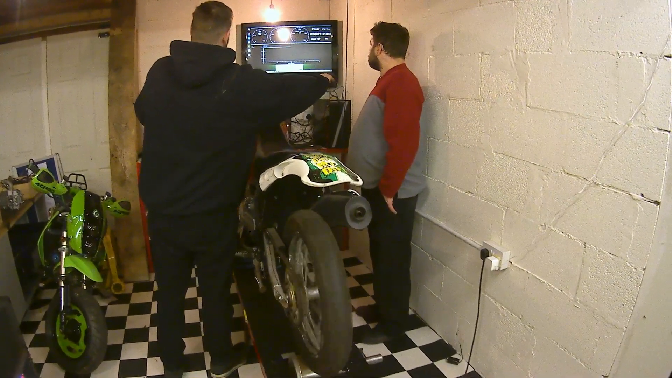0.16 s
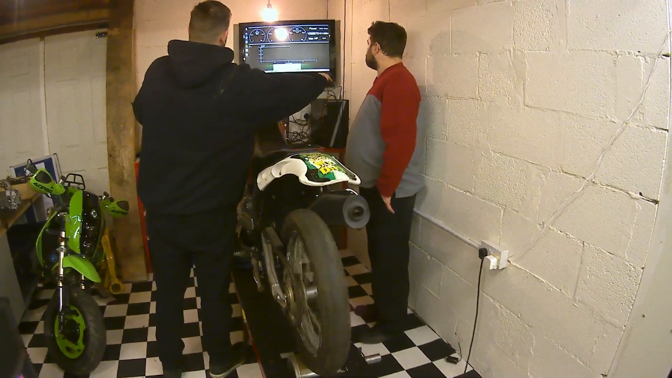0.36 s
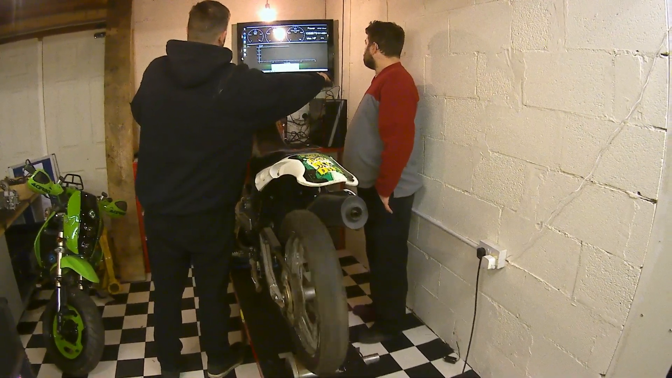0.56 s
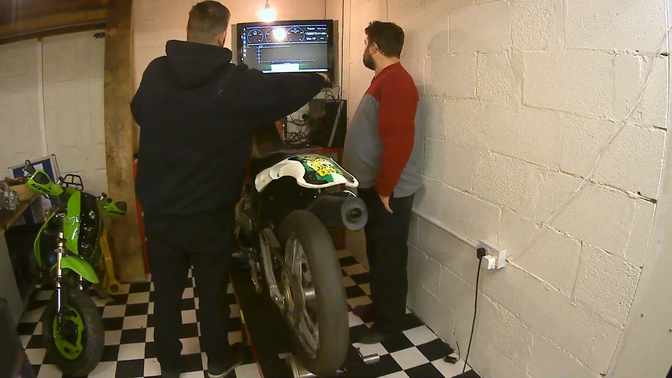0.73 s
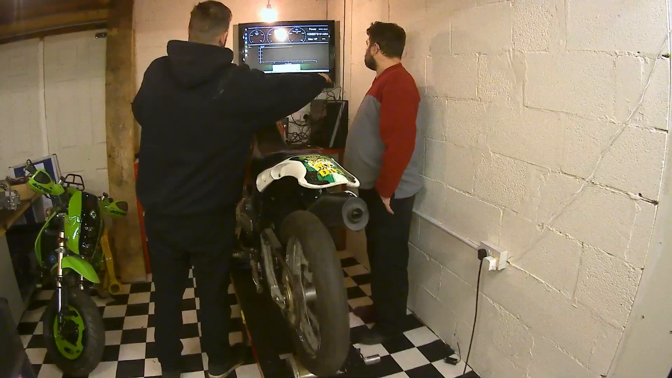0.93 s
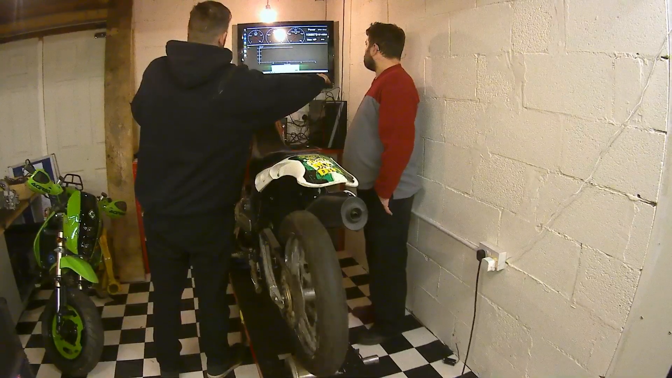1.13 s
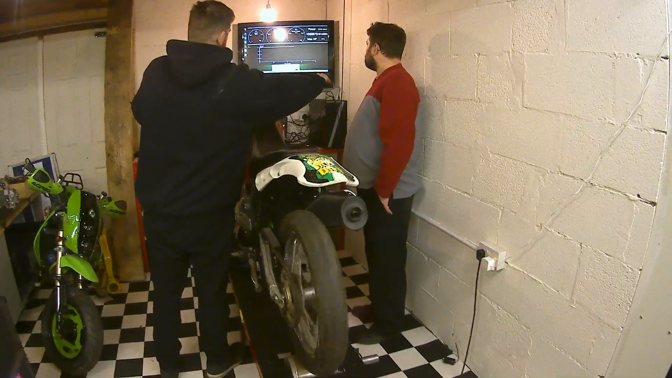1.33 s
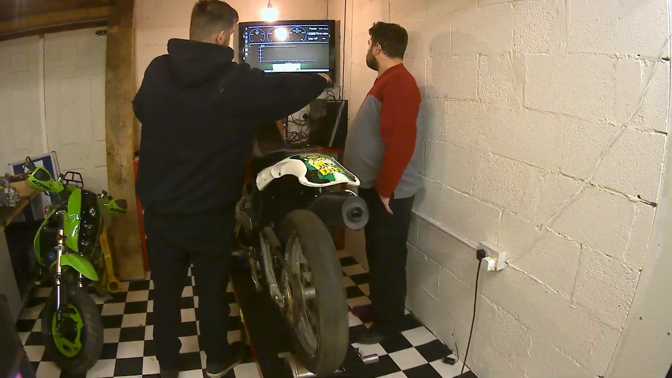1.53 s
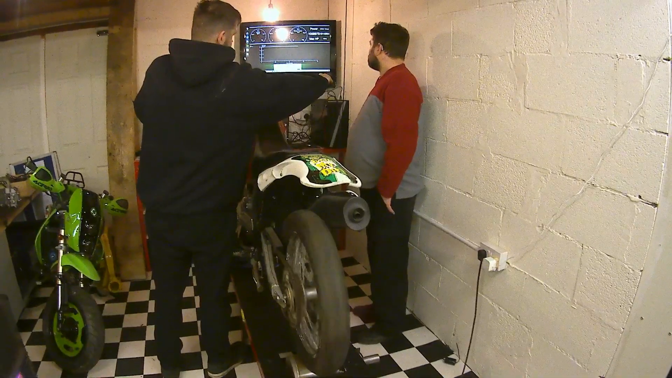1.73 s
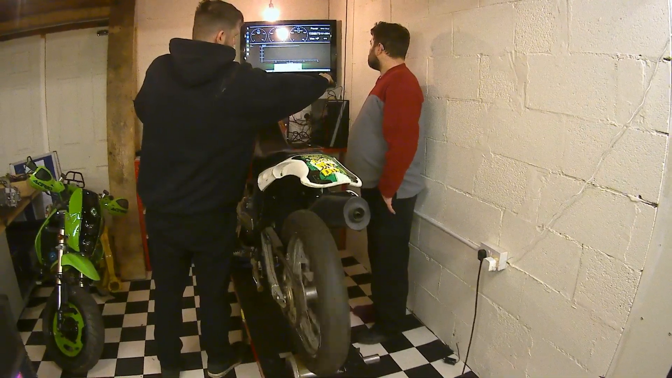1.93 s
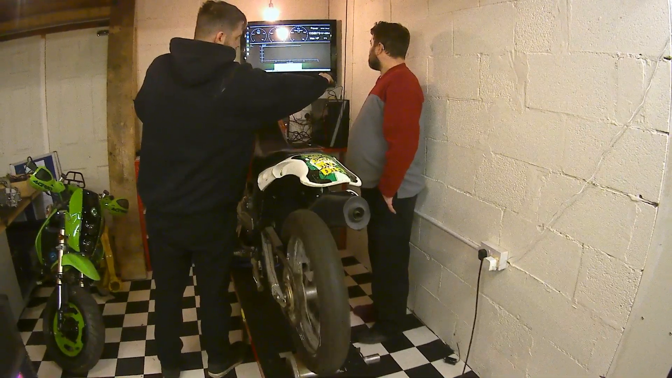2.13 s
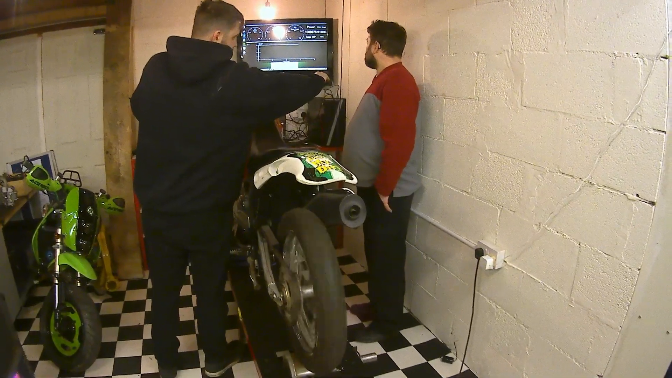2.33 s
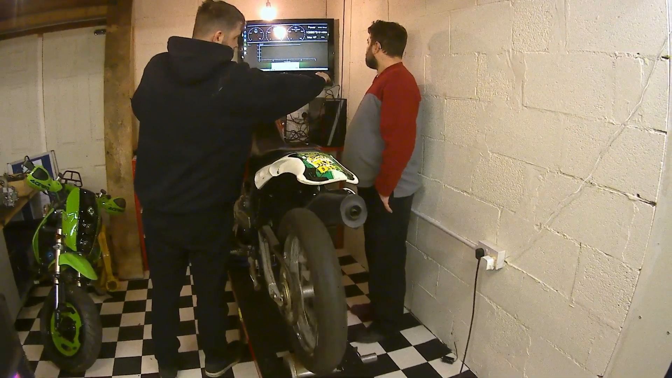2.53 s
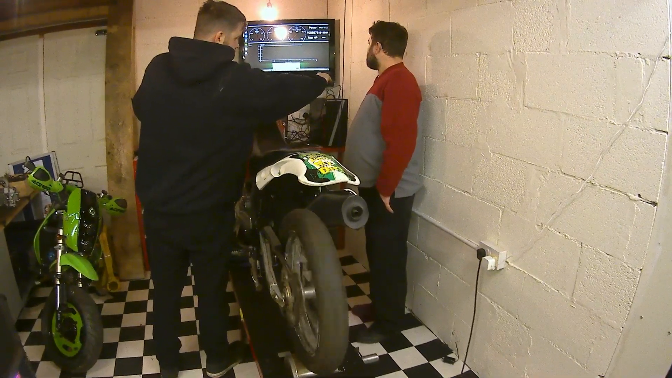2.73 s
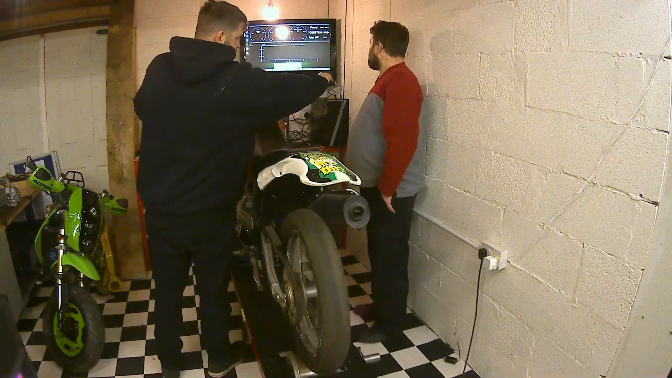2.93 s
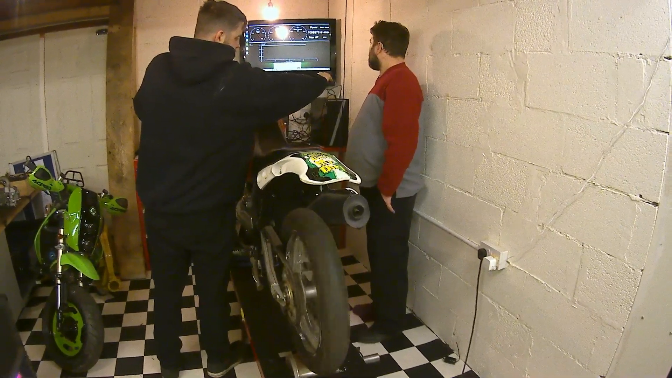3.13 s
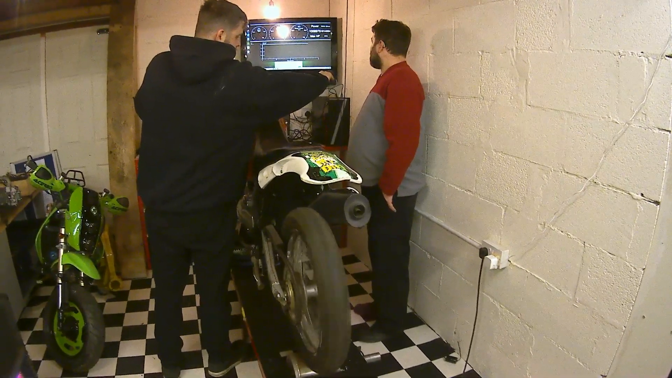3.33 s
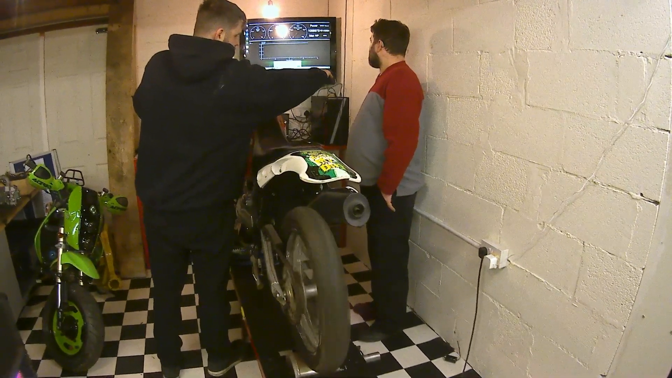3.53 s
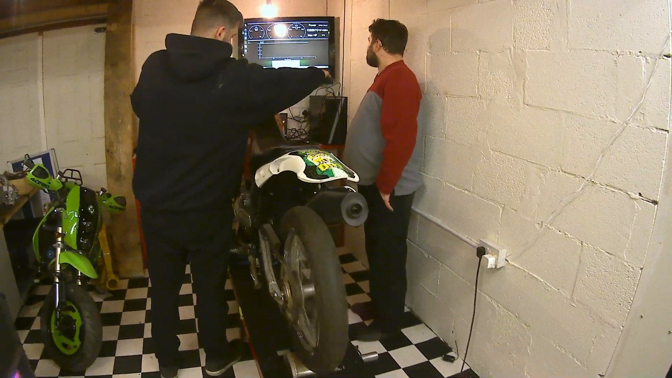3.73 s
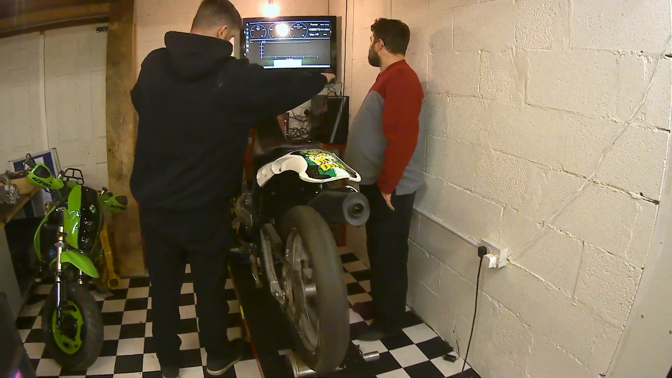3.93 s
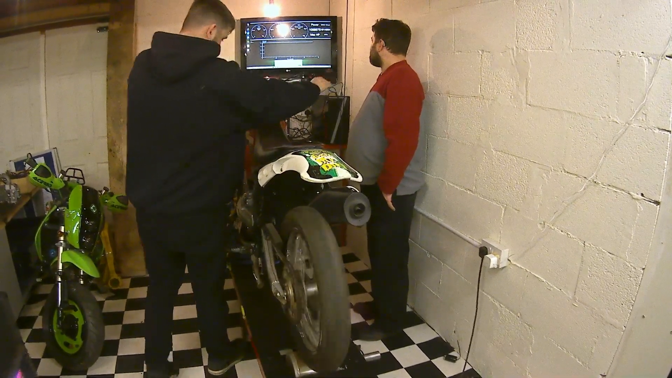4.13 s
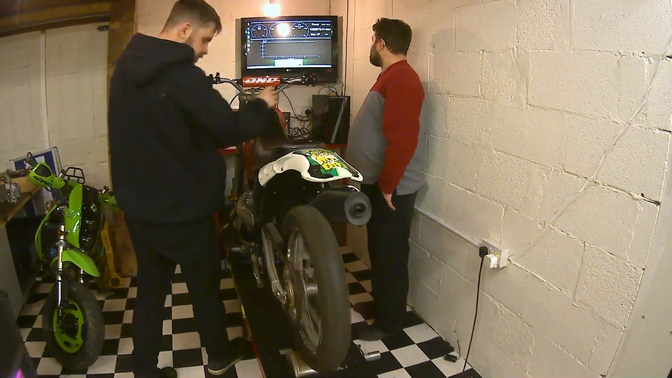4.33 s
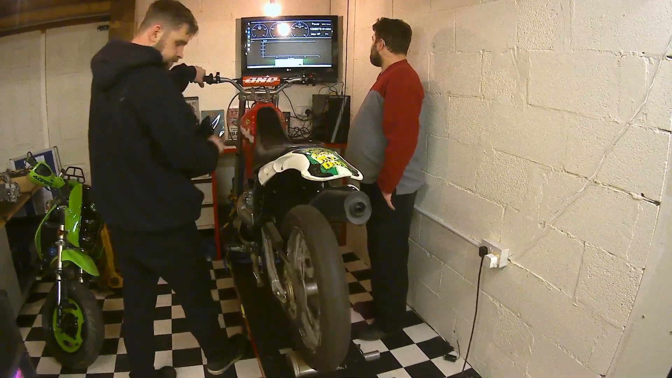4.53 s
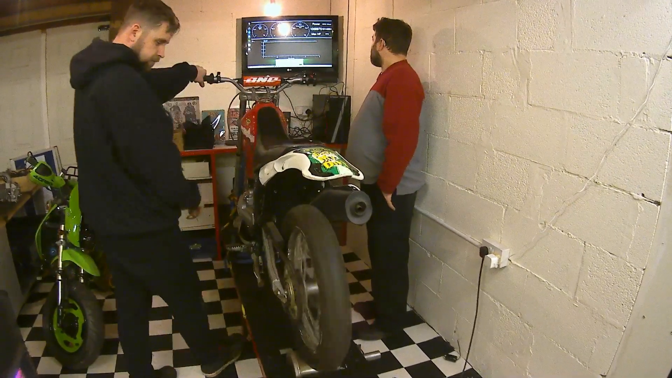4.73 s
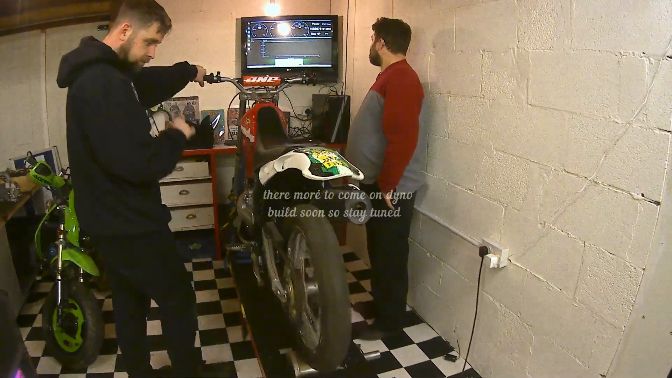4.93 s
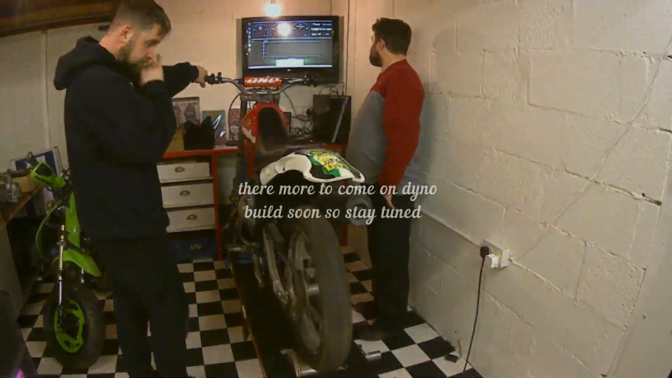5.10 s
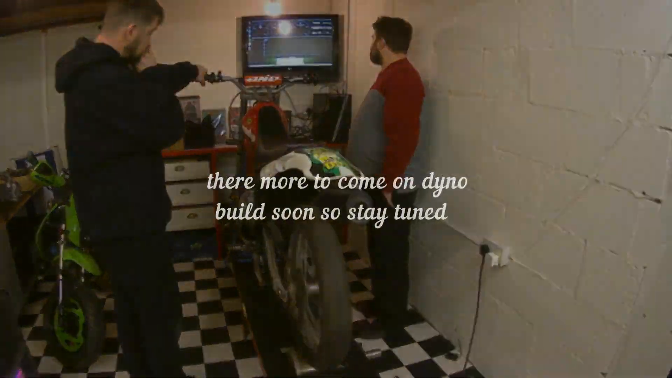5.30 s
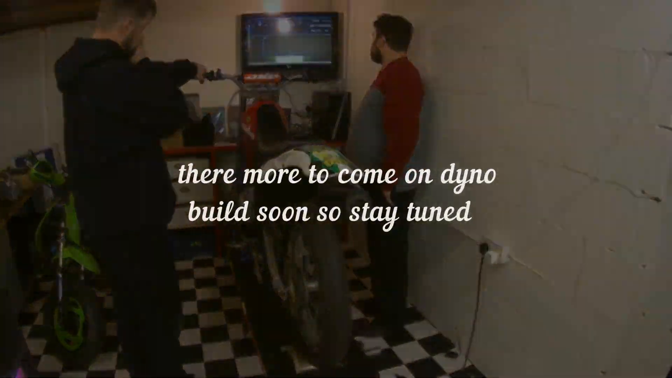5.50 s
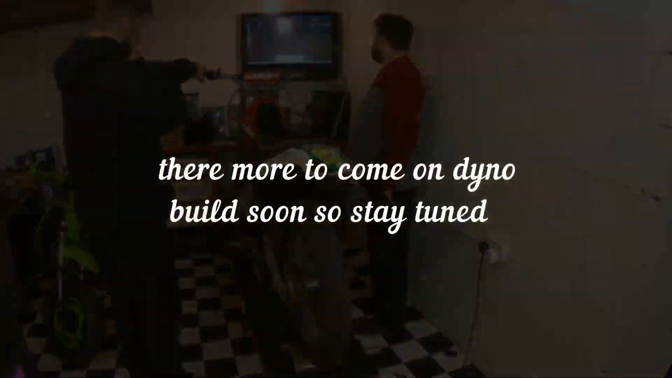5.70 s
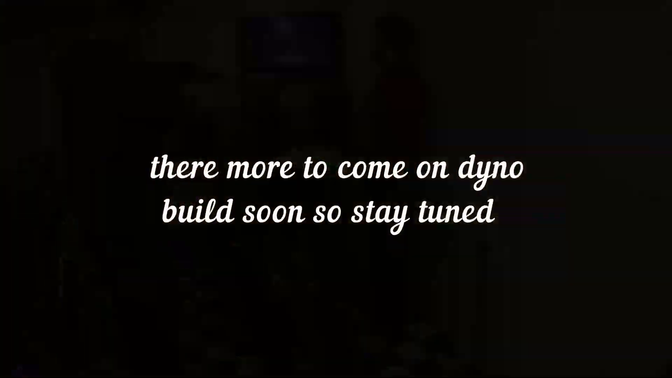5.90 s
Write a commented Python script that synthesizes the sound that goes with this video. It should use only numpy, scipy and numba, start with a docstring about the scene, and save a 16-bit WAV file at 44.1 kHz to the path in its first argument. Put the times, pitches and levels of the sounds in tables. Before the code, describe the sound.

Close, boomy engine sound in a small block-walled garage: a quick, rough motorcycle idle with chain rattle, ticking valve gear and soft low thumps on the microphone. One long rev rises into a hard, slightly distorted roar, then winds down through gear whine and tread hum to a slow chugging idle. The treble is muffled, the room rings briefly, and the end fades to silence.

```python
"""A small block-walled workshop: a motorcycle on a roller test stand idles fast and lumpy, sweeps up to a peak,
coasts down and sinks to a slow idle while the sound fades out. Sine orders of the crank make the exhaust note,
with pipe and room resonances; noise, ticks and gear tones ring the engine cases. Tread hums as it coasts down,
low puffs thump the microphone, and a narrow-band microphone flattens the loudest peaks."""
import sys
import numpy as np
from scipy import signal
from scipy.fft import irfft
from scipy.io import wavfile
from scipy.ndimage import uniform_filter1d, map_coordinates
from numba import njit

SR = 44100
rng = np.random.default_rng(int(sys.argv[2]) if len(sys.argv) > 2 else 0)


def file_out(sig):
    """Save sig as 16-bit WAV at sys.argv[1]."""
    # one column per channel
    cols = np.atleast_2d(sig).T
    # limit, then scale
    lim = np.clip(cols, -1, 1)
    pcm = np.round(lim * 32767).astype(np.int16)
    wavfile.write(sys.argv[1], SR, pcm)


N = 262836
TIME_S = np.arange(N) / SR

# crank speed, before its corners are rounded off: [t/s, f/Hz]
CRANK_SPEED = [(0, 34.3), (1.1, 33.15), (1.6, 33.64), (2.1, 36.14), (2.31, 39.54), (2.93, 57.62),
               (3.42, 69.08), (3.56, 65.03), (3.87, 57.53), (4.29, 46.66), (4.61, 39.22), (5.0, 30.82),
               (5.3, 26.95), (5.6, 24.98), (5.96, 25.24)]
# midpoints of the moves: throttle opens, throttle shuts, engine settles: [t/s, duration/s]
THROTTLE_CHANGES = [(2.079, 0.046), (3.47, 0.033), (4.502, 0.33)]
# balance of the exhaust orders in each state: [multiple of crank speed, relative level/dB]
FAST_IDLE_ORDERS = [(0.5, -9), (1, 1), (1.5, -10), (2, -2.5), (2.5, -10.5), (3, -3), (3.5, -8), (4, 5),
                    (4.5, -30), (5, -12.5), (5.5, 5), (6, -8.5), (6.5, -16.5), (7, -23.5), (7.5, -24.5),
                    (8, -6.5), (8.5, -18.5), (9, 0.5), (9.5, -7.5), (10, -15), (10.5, -24), (11, -11),
                    (11.5, -7.5), (12, -6), (16, -4), (16.5, -11.5), (20, -6)]
PULLING_ORDERS = [(1, -12.5), (2, -3), (3, -10), (4, -8.5), (5, -10), (5.5, -25), (6, -12), (7, -12),
                  (8, -15), (9, -14), (10, -12), (11, -13), (12, -21)]
COASTING_ORDERS = [(1, -10.5), (2, 5), (3, -16), (4, -3), (5, -13.5), (5.5, -19), (6, -9.5), (7, -22),
                   (8, -15), (9, -9.5), (9.5, -7.5), (10, -17.5), (11, -17.5), (12, -20.5), (14, -13.5)]
SETTLING_ORDERS = [(1, -9), (1.5, -0.5), (2, 2.5), (2.5, -3), (3, 3.5), (3.5, -2.5), (4, -1), (5, -25),
                   (6, -14.5), (6.5, -1), (8, -9.5), (8.5, -13)]  # while the revs sink to idle
SLOW_IDLE_ORDERS = [(1, 2.5), (1.5, -12), (2, -5), (2.5, -8), (3, -1), (3.5, -5), (4, -11.5), (4.5, -18),
                    (5, 2), (5.5, -13), (6.5, -6), (7, -8.5), (7.5, -5.5), (8, -22)]
# pipe and room resonances: [f/Hz, width/Hz, level/dB]
PIPE_MODES = [(28, 45, -1.5), (51.4, 8, 9), (66, 13, 0), (83.5, 14, -2), (94.1, 10, 4.5), (134.2, 45.5, 1),
              (186.5, 24.3, 2), (219.4, 5.1, -6), (232.5, 8.4, 4.5), (251.7, 13.7, 7.5), (298.8, 50.5, 5),
              (330.4, 30, 3), (357, 39.6, 4.5), (388.3, 41, 4.5), (505, 84, -8.5), (529.3, 28, 0.5),
              (613, 15, 0.5), (633, 74, 4)]
# engine cases ringing under the valve gear: [f/Hz, width/Hz, level/dB]
CASE_MODES = [(440, 148, -9), (706.5, 147, 0.5), (851, 343, -1.5), (1024, 76, 3), (1134, 85, -2),
              (1392, 362, -2), (1705, 500, -6.5), (2192, 199, -6.5), (2550, 780, -10.5), (3030, 1800, -17)]
# gear teeth meshing: [multiple of crank speed, pulling level/dB, coasting and slow idle level/dB],
# sine peak against the roar
GEAR_MESH = [(13, -25, -23.5), (14, -27.5, -22.5), (15, -21.5, -23), (16, -18.5, -17.5), (17, -20, -26),
             (18, -20, -19.5), (19, -25, -22.5), (20, -25.5, -26), (21, -21.5, -25.5), (22, -31, -38.5),
             (23, -29, -34.5), (24, -28, -28.5), (25, -24.5, -23), (26, -26, -19), (28, -27.5, -20)]
# exhaust puffs that reach the microphone: [t/s, level/dB]
PUFF_TIMES = [(0.319, -12), (0.738, -17), (0.798, -14), (0.849, -24), (0.978, -10), (1.747, -16),
              (1.811, -13.5), (1.88, -13.5), (1.93, -11), (1.99, -17), (4.719, -18), (4.829, -20),
              (4.858, -12), (4.948, -11), (4.979, -13), (5.019, -27), (5.152, -21), (5.229, -22),
              (5.299, -9), (5.38, -14)]
# one value a state (fast idle, pulling, coasting, slow idle): [level/dB]
RUSH_DB = [-9.5, -12.5, -13, -8]  # gas rush against a note of rms 1
TICKS_DB = [-15, -14, -12, -15]  # valve and firing ticks against the roar
RATTLE_DB = [-13, -10, -11.5, -12.5]  # chain and valve gear rattle against the roar

# base level in the same four states at the reference speed, and rise per doubling of speed
REFERENCE_HZ = 34
EXHAUST_DB, EXHAUST_DB_PER_OCTAVE = [-19.5, -15, -17, -19.5], [5.6, 6.2, 7.1, 2.9]
CLATTER_DB, CLATTER_DB_PER_OCTAVE = [-18.5, -17, -23.5, -19.5], [14, 10.2, 15.1, 6.1]
# the idle warms to its level at the start; the throttle is eased off its stop before it opens
SETTLE_DB, SETTLE_S = -1.5, 0.83
EASE_FROM_S, EASE_TAKES_S, EASE_EXHAUST_DB, EASE_CLATTER_DB = 1.17, 0.68, 0.5, 0.45
# hand-over from the settling orders to the slow idle orders
SETTLED_S, SETTLED_TAKES_S = 5.22, 0.14
SETTLING_DRIVE = .5  # how strongly the uneven settling note excites the resonances, 0-1
# early in the idle these orders swell: {multiple of crank speed: starting trim/dB}
SWELLING_DB, SWELL_FROM_S, SWELL_TAKES_S = {1: -14, 3: -16, 5.5: -5.5}, 0.42, 0.51
# part-way down the coasting note loses its second order
DROP_S, DROP_TAKES_S, DROP_DB = 3.98, 0.12, -7.5
# waver of every order, extra while settling, extra above order 2.5; share of the first removed in fast idle
WAVER_DB, SETTLING_WAVER_DB, UPPER_WAVER_DB, IDLE_STEADIES = 1.0, 1.0, 1.5, .4
# the room answers a gliding tone late, and cancels it at one pitch (depth 0-1)
ROOM_LAG_S, NULL_HZ, NULL_WIDTH_HZ, NULL_DEPTH = 0.027, 107.8, 6.2, 0.44
# hard firing once a cycle: moments that set its beat before and after the sweep, depth of the lump
HARD_FIRING_S = 1.865, 5.295
LUMP_EASING, LUMP_SLOW, LUMP_BELOW_HZ, LUMP_RANGE_HZ = .34, .14, 29, 3.3
# hard firing barks: level when fully eased, band, spread from pulse to pulse; slow idle against easing
BARK_DB, BARK_HZ, BARK_WIDTH_HZ, BARK_SCATTER_DB, SLOW_BARK_DB = -23, 328, 180, 2.0, -18
PUFF_HZ, PUFF_DECAY_CYCLES = 77, 0.99
ROAR_FLICKER_DB, GEAR_SLIP_RAD = .45, .36
# under load the cases shout in a higher band
LOAD_HZ, LOAD_WIDTH_HZ, LOAD_DB, LOAD_FROM_S, LOAD_TAKES_S = 1345, 130, -5, 2.31, 1
# tread hum: fade-in and fade-out starts, first pitch, slowing as a share per second
TREAD_FROM_S, TREAD_OFF_FROM_S, TREAD_HZ, TREAD_SLOWING = 3.6, 4.92, 608, .42
TREAD_DB, TREAD_DB_PER_S, TREAD_WAVER_DB = -31, -1, 2.5  # drive into the resonances
WALLS_T60_S, WALLS_DB = 0.41, -5.5
MIC_HZ, CEILING, TOP_HZ = 3900, .7, 15780
RASP_DB = -11  # how much of the overload's treble passes the narrow band
FADE_FROM_S, FADE_TO_S = 4.61, 5.964


def exhaust(hz, turns, share):
    """Firing repeats over two turns, so the note is half-orders of the crank, with gas rush and buffeting."""
    settled = ramp(SETTLED_S - SETTLED_TAKES_S / 2, SETTLED_TAKES_S)
    gains = order_gains(hz, share, settled)
    waver_db = WAVER_DB * (1 - IDLE_STEADIES * share[0]) + SETTLING_WAVER_DB * share[3] * settled_not(settled)
    slip = 0.018 * walk(16)  # radians per half-order, shared by the whole note
    note = np.zeros(N)
    for half, gain in gains.items():
        level_db = waver_db * walk(7) + UPPER_WAVER_DB * (half > 5) * walk(30)
        phase = half * (np.pi * turns + slip) + 2 * np.pi * rng.random()
        note += gain * undb(level_db) * np.sin(phase)
    idling = share[0] + share[3]
    return note + undb(np.dot(RUSH_DB, share)) * gas_rush(turns) + undb(-29.5 + 4.9 * idling) * buffet()


def settled_not(settled):
    """Weight of the uneven settling note, which gives way as the idle settles."""
    return 1 - settled


def order_gains(hz, share, settled):
    """Each state drives its own balance of half-orders; sweeping ones pass through the resonances."""
    weights = *share[:3], share[3] * settled_not(settled), share[3] * settled
    late_hz = np.interp(TIME_S - ROOM_LAG_S, TIME_S, hz)[::64]
    early = 1 - ramp(SWELL_FROM_S, SWELL_TAKES_S)
    tables = FAST_IDLE_ORDERS, PULLING_ORDERS, COASTING_ORDERS, SETTLING_ORDERS, SLOW_IDLE_ORDERS
    gains = {}
    for table, weight in zip(tables, weights):
        total = np.sqrt(np.sum(undb(np.array(table)[:, 1]) ** 2) / 2)  # rms of the summed sines
        for order, db in table:
            half = int(2 * order + .5)
            if table is FAST_IDLE_ORDERS:  # both idle tables already hold the resonances
                shaping = undb(SWELLING_DB.get(order, 0) * early)
            elif table is SLOW_IDLE_ORDERS:
                shaping = 1
            else:
                shaping = response(half * late_hz / 2).repeat(64)[:N]
            if table is SETTLING_ORDERS:
                shaping = shaping ** SETTLING_DRIVE
            if table is COASTING_ORDERS and order == 2:
                shaping = shaping * undb(DROP_DB * ramp(DROP_S, DROP_TAKES_S))
            gains[half] = gains.get(half, 0) + weight * shaping * undb(db) / total
    return gains


def gas_rush(turns):
    """Turbulent gas rings the pipe and surges once a turn."""
    hiss = svf(rng.standard_normal(N), 150.0, 210.0)
    return unit(ring(hiss, PIPE_MODES)) * (1 + 0.69 * np.cos(2 * np.pi * turns))


def buffet():
    """Gas buffets the microphone as wavering noise around 22 Hz."""
    return unit(svf(rng.standard_normal(N), 22., 30.)) * undb(0.99 * walk(5))


def bark(cycles):
    """One pulse a cycle, uneven in strength, rings the upper pipe resonances."""
    cycle = np.floor(cycles).astype(int)
    strength = undb(BARK_SCATTER_DB * rng.standard_normal(N // 100))[cycle]
    pulses = np.clip(np.diff(cycle, prepend=cycle[0]), 0, 1) * strength
    band = svf(pulses, float(BARK_HZ), float(BARK_WIDTH_HZ))
    return undb(BARK_DB) * unit(ring(band, PIPE_MODES))


def puffs():
    """Each exhaust puff is about one cycle of low pressure swing under a Gaussian decay."""
    out = np.zeros(N + SR)
    phase = np.arange(int(3 * SR / PUFF_HZ)) * PUFF_HZ / SR
    puff = np.sin(2 * np.pi * phase) * np.exp(-(phase / PUFF_DECAY_CYCLES) ** 2)
    for s, db in PUFF_TIMES:
        out[int(s * SR):][:len(phase)] += undb(db) * puff
    return out[:N]


def clatter(turns, share):
    """Chain and tyre roar, ticks, rattle and gear whine all strike the engine cases, which ring."""
    roar = rng.standard_normal(N) * (1 + 0.041 * np.cos(2 * np.pi * turns + 1.7))
    drive = roar * undb(ROAR_FLICKER_DB * walk(13))
    ticks = unit(np.diff(np.floor(turns), prepend=0))  # one a turn
    drive += undb(np.dot(TICKS_DB, share)) * ticks
    drive += undb(np.dot(RATTLE_DB, share)) * rattle(turns)
    drive += gear_whine(turns, share)
    load = share[1] * ramp(LOAD_FROM_S, LOAD_TAKES_S) * undb(LOAD_DB)
    shout = svf(drive, float(LOAD_HZ), float(LOAD_WIDTH_HZ))
    return unit(ring(drive, CASE_MODES) - load * shout)


def rattle(turns, count=128):
    """A fixed pattern of knocks around the crank repeats each turn; its orders share one strength."""
    pattern = irfft(np.exp(2j * np.pi * rng.random(count // 2 + 1)), count)
    return unit(map_coordinates(pattern, [turns % 1 * count], mode="grid-wrap"))


def gear_whine(turns, share):
    """Meshing teeth sing at multiples of crank speed, wavering in level and phase."""
    whine = np.zeros(N)
    for teeth, pull_db, coast_db in GEAR_MESH:
        gain = share[1] * undb(pull_db) + (share[2] + share[3]) * undb(coast_db)
        phase = 2 * np.pi * int(teeth + .5) * turns + GEAR_SLIP_RAD * walk(35)
        whine += gain * undb(1.2 * walk(9)) * np.sin(phase)
    return whine


def tread():
    """Tread blocks hum on the roller as the freed wheel slows, swelling at each pipe and room resonance."""
    since_s = TIME_S - TREAD_FROM_S
    hz = TREAD_HZ * np.exp(-TREAD_SLOWING * since_s)
    on = ramp(TREAD_FROM_S, 0.11) - ramp(TREAD_OFF_FROM_S, 0.54)
    level = undb(TREAD_DB + TREAD_WAVER_DB * walk(15) + TREAD_DB_PER_S * since_s)
    hum = np.sqrt(2) * np.sin(2 * np.pi * np.cumsum(hz) / SR)
    return on * level * response(hz) * hum


def walls(x):
    """Block walls return a dense decaying tail, above the range where single room modes rule."""
    s = np.arange(int(.6 * SR)) / SR
    decay = np.exp(-np.log(1000) * s / WALLS_T60_S)
    tail = rng.standard_normal(len(s)) * decay * (s > .006)  # silent until the first return
    high = signal.sosfilt(signal.butter(2, 450, "high", fs=SR, output="sos"), x)
    return signal.fftconvolve(high, tail / np.linalg.norm(tail))[:N]


def response(hz):
    """Gain of pipe and room for a tone at hz; resonances are steep-sided and their powers add."""
    null = 1 - NULL_DEPTH * np.exp(-((hz - NULL_HZ) / NULL_WIDTH_HZ) ** 2)
    power = 0
    for mid, width, db in PIPE_MODES:
        detune = (hz / mid - mid / hz) * mid / width
        power = power + undb(db) ** 2 / (1 + detune ** 2) ** 2
    return null * np.sqrt(power)


def states():
    """Share of fast idle, pulling, coasting and slow idle over time; the shares add to 1."""
    moves = [np.clip((TIME_S - at) / span + .5, 0, 1) for at, span in THROTTLE_CHANGES]
    return -np.diff([np.ones(N)] + moves + [np.zeros(N)], axis=0)


def loudness(levels_db, slopes_db, hz, share):
    """Level follows throttle state and crank speed."""
    octaves = np.log2(hz / REFERENCE_HZ)
    level_db = SETTLE_DB * (1 - ramp(0, SETTLE_S))
    for weight, db, slope in zip(share, levels_db, slopes_db):
        level_db = level_db + weight * (db + slope * octaves)
    return level_db


def ring(x, modes):
    """Sum of resonances, neighbours in opposite phase."""
    return sum((-1) ** k * undb(db) * svf(x, float(hz), float(width)) for k, (hz, width, db) in enumerate(modes))


@njit
def svf(x, hz, width):
    """State-variable band-pass, gain 1 at the centre."""
    y, band, low = np.empty(len(x)), 0., 0.
    g, k = np.tan(np.pi * hz / SR), width / hz
    for i in range(len(x)):
        v = (band + g * (x[i] - low)) / (1 + g * (g + k))
        band, low, y[i] = 2 * v - band, low + 2 * g * v, k * v
    return y


def walk(rate):
    """Random levels held 1 / rate s and slewed twice; spread near 1.5."""
    k = int(SR / rate)
    steps = np.repeat(rng.standard_normal(N // k + 1), k)
    return 2.0 * uniform_filter1d(uniform_filter1d(steps, k), k)[:N]


def ramp(start, span):
    """Rises from 0 to 1 over span seconds."""
    return np.clip((TIME_S - start) / span, 0, 1)


def undb(db):
    """Gain of a level in dB."""
    return 10 ** (np.asarray(db) / 20)


def unit(x):
    """Scaled to rms 1."""
    return x / np.sqrt(np.mean(x ** 2))


def scene():
    """The motorcycle in its room: one crank drives exhaust and clatter, and the walls answer."""
    hz = uniform_filter1d(np.interp(TIME_S, *np.transpose(CRANK_SPEED)), SR // 20)
    turns = np.cumsum(hz) / SR + .3
    share = states()
    easing = ramp(EASE_FROM_S, EASE_TAKES_S) * share[0]
    exhaust_db = loudness(EXHAUST_DB, EXHAUST_DB_PER_OCTAVE, hz, share) + EASE_EXHAUST_DB * easing
    clatter_db = loudness(CLATTER_DB, CLATTER_DB_PER_OCTAVE, hz, share) + EASE_CLATTER_DB * easing

    # the lumpy throb: one surge per two-turn cycle
    early, late = (turns[int(s * SR)] for s in HARD_FIRING_S)
    cycles = (turns - np.where(share[0] + share[1] > 0, early, late)) / 2
    lump = LUMP_EASING * easing + LUMP_SLOW * np.clip((LUMP_BELOW_HZ - hz) / LUMP_RANGE_HZ, 0, 1)
    throb = 1 + np.clip(lump, 0, .9) * np.cos(2 * np.pi * (cycles - .1))

    bike = undb(exhaust_db) * np.sqrt(throb) * exhaust(hz, turns, share)
    bike += undb(clatter_db) * throb * clatter(turns, share)
    bike += (easing + undb(SLOW_BARK_DB) * share[3]) * bark(cycles)
    bike += tread()
    return (bike + undb(WALLS_DB) * walls(bike) + puffs())[None]


def record(dry):
    """A narrow-band microphone flattens loud peaks; a little of their treble rasp passes. The end fades out."""
    band = signal.ellip(5, .3, 70, MIC_HZ, fs=SR, output="sos")
    heard = signal.sosfilt(band, dry)
    flat = np.clip(heard, -CEILING, CEILING)
    narrow = signal.sosfiltfilt(band, flat)
    treble = signal.butter(8, 4600, "high", fs=SR, output="sos")
    rasp = signal.sosfiltfilt(treble, flat - heard)
    fade = 1 - ramp(FADE_FROM_S, FADE_TO_S - FADE_FROM_S)
    faded = (narrow + undb(RASP_DB) * rasp) * fade
    return signal.sosfilt(signal.ellip(12, .2, 80, TOP_HZ, fs=SR, output="sos"), faded)


dry = scene()
out = record(dry)
file_out(out)
```